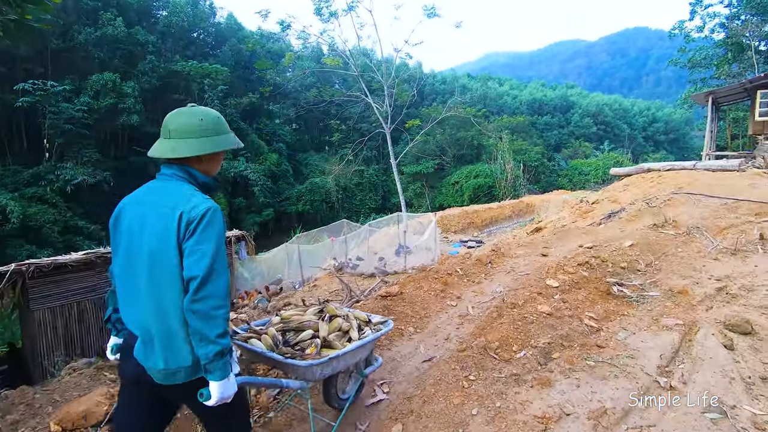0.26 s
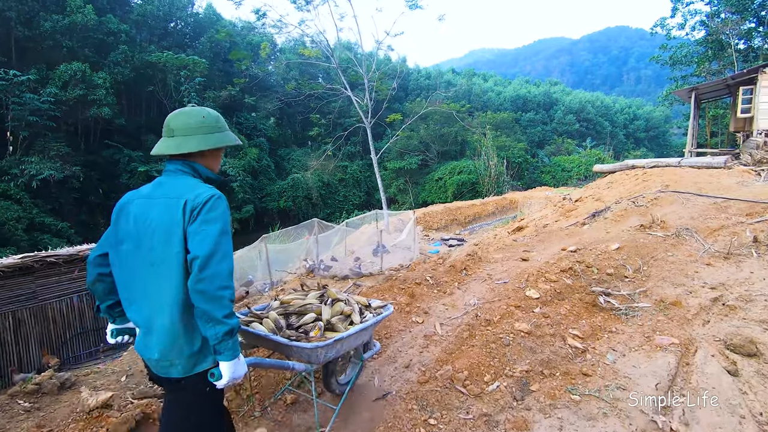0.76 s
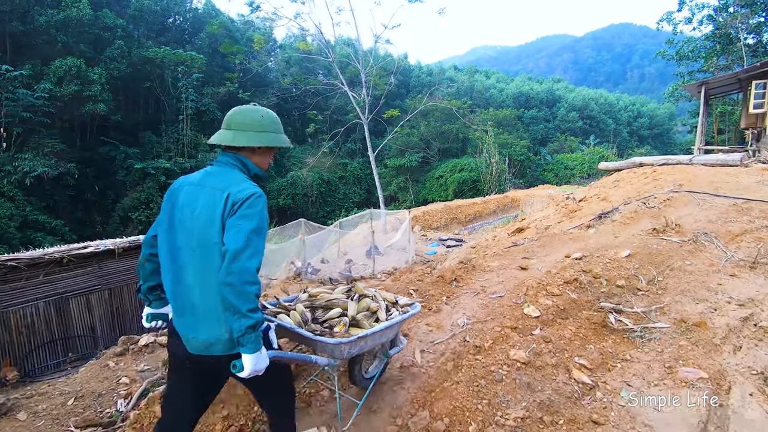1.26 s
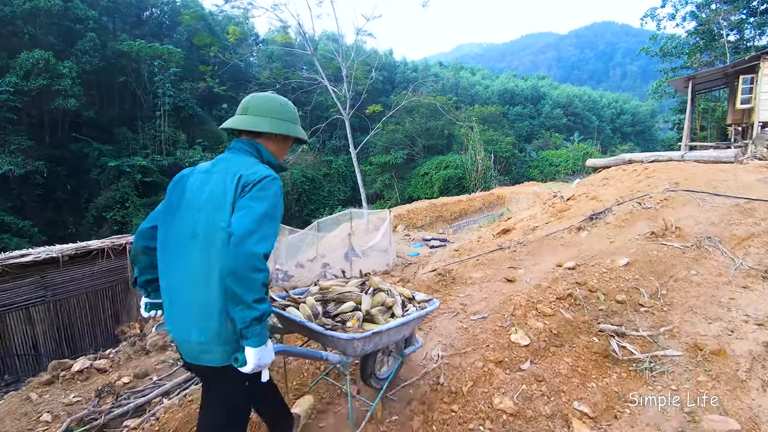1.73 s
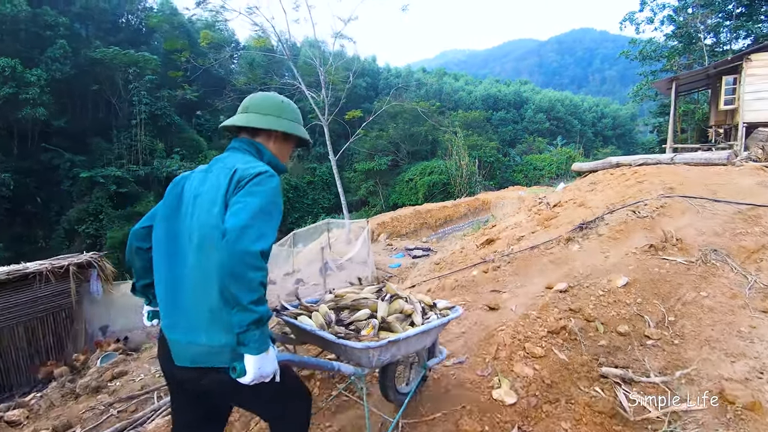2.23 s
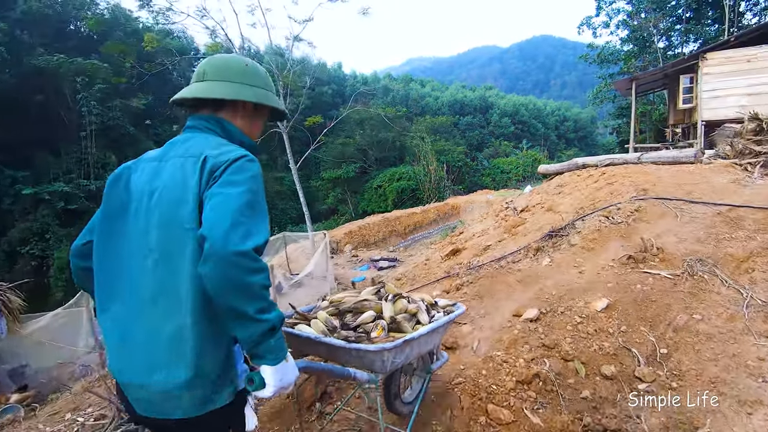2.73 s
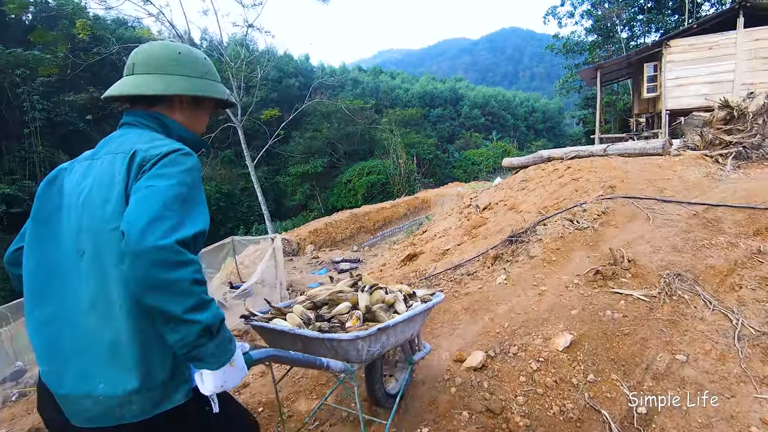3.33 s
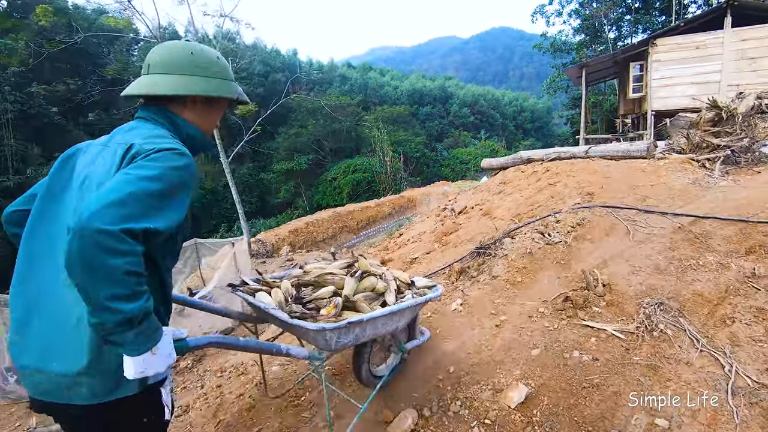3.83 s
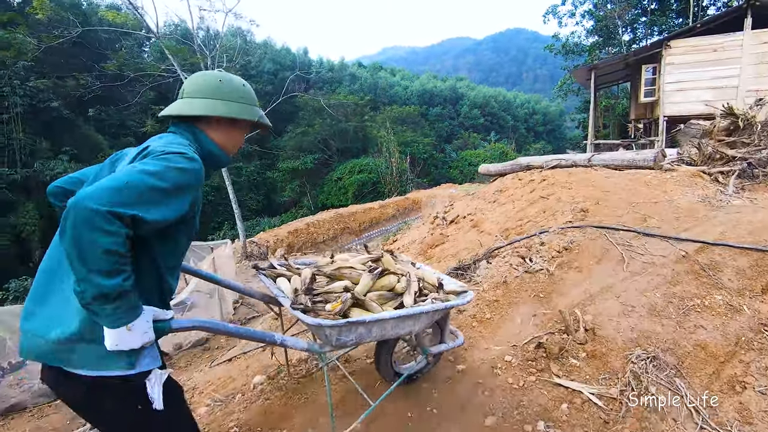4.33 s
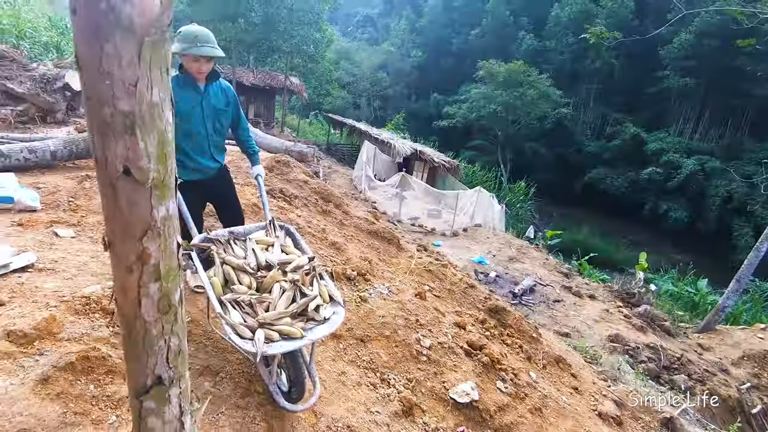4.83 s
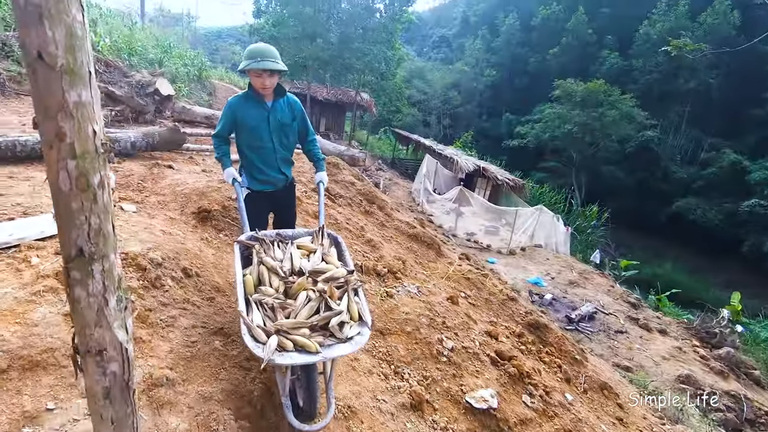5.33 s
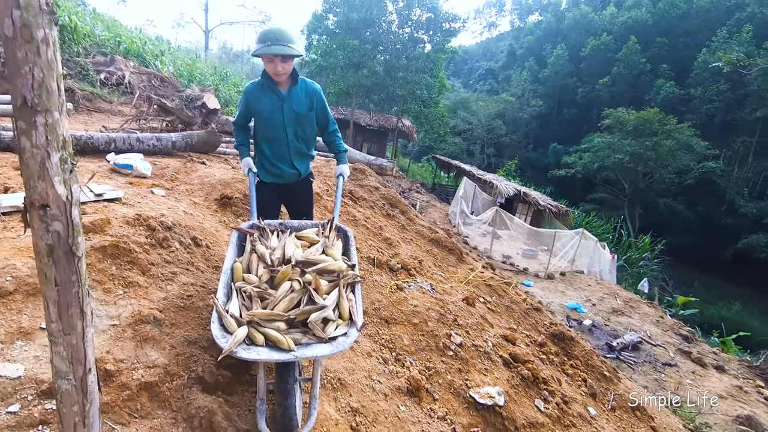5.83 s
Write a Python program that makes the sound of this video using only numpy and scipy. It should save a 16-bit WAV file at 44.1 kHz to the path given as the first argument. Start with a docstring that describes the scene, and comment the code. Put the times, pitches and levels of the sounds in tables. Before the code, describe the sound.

A steel wheelbarrow loaded with dry corn cobs is pushed over rough hillside dirt. From the start the load knocks and rattles irregularly, with crunching soil. At about 0.4 to 0.7 seconds the dry axle groans hoarsely in three short pushes, followed by a small squeak near 0.9 and thin, higher squeaks around 1.7. Twigs crack at roughly 0.7, 1.0, 2.4 and 3.2; light steel clinks are clearest near 2.35. Between 2.2 and 4.1 the clatter and dull boot and tyre thuds grow denser, strongest around 3.5 to 3.8. A brief, piercing squeal stands out at 4.6, then sparser bumps and thuds continue to 6. Behind, a throbbing cricket fades by 1.2, leaving steady faint insects; a distant bird repeats quick falling-and-rising chirps. Valley air is soft, and low wind buffets the microphone most strongly near 5.9.

```python
"""Loaded wheelbarrow on rough ground

A steel wheelbarrow full of corn cobs is pushed over rough dirt on a hillside. Its dry axle groans and
squeals as modulated harmonic tones; bursts of random impacts, filtered by resonances, make the load clatter,
the frame clink, boots and tyre thud and twigs snap. Behind it are insects (filtered noise and a throbbing
tone), a small bird repeating one phrase of gliding tones, and wind on the microphone (slow filtered noise)."""
import sys
import numpy as np
from scipy import signal
from scipy.fft import rfft, irfft
from scipy.io import wavfile
from scipy.ndimage import uniform_filter1d

SR = 44100
rng = np.random.default_rng(int(sys.argv[2]) if len(sys.argv) > 2 else 0)


def unload_wav(signal):
    """Save mono or channel-first audio to the path in sys.argv[1] as 16-bit WAV at rate SR, clipped to [-1, 1]."""
    wavfile.write(
        sys.argv[1],
        SR,
        np.round(np.clip(np.atleast_2d(signal).T, -1, 1) * 32767).astype(np.int16),
    )


N = 267863
TIME = np.arange(N) / SR  # s

# All level_db columns are relative: the functions add an overall gain to most of them.
# Spectral envelopes of the noises and impacts: pitch_hz, level_db
CHORUS_SPECTRUM = [(5700, -30.5), (6300, -9.5), (6700, 3), (7050, 6.5), (7350, 8), (7650, -2), (7950, -8.5),
                   (8150, -32.5), (8700, -38.5), (9800, -24), (10500, -41.5), (11300, -59)]
AIR_SPECTRUM = [(60, -10.5), (130, 1), (190, 4), (400, -13), (1000, -15.5), (2000, -15), (3300, -18),
                (4200, -15), (4700, -17), (5500, -30), (8700, -41), (10200, -42), (11300, -76),
                (15000, -69)]
WIND_SPECTRUM = [(10, -6), (28, 4), (45, 0.5), (80, -3.5), (140, -22), (300, -29.5), (900, -90)]
CLATTER_SPECTRUM = [(60, -37), (140, -4), (220, -3.5), (340, -5), (1000, -4.5), (2000, -2.5), (3200, -8.5),
                    (4600, -8.5), (5600, -23.5), (7500, -14), (10000, -36), (15000, -60)]
CRACK_SPECTRUM = [(100, -15.5), (600, -6.5), (1900, -2.5), (2700, -5.5), (4000, -4), (5500, -15),
                  (8000, -17), (11000, -39.5), (15500, -39)]
THUMP_SPECTRUM = [(40, -1), (120, -9), (220, 8), (330, 6.5), (560, 1), (900, 4), (1600, -11), (4000, -60)]

# Wind force at the microphone: time_s, level_db
WIND_LEVEL = [(0.0, -57), (2.3, -63.5), (2.8, -53.5), (3.7, -57.5), (4.6, -56.5), (5.45, -45.5),
              (5.88, -37.5), (6.07, -52)]
# Single gusts: centre_s, level_db
GUSTS = [(0.34, -40.5), (3.981, -47.5), (4.715, -44)]
GUST_S = 0.037  # time from the centre of a gust to 1/e of its peak

# Rolling wheel: time_s, tray_rumble_db, soil_crunch_db
ROLLING = [(0.0, -59, -62), (0.33, -81, -59), (0.4, -75, -41.5), (0.56, -68, -49), (0.75, -56, -45),
           (1.08, -73, -66.5), (1.36, -55, -60.5), (1.85, -62.5, -57), (2.15, -48, -53.5),
           (2.75, -56.5, -62), (3.15, -49.5, -53), (3.44, -51.5, -57.5), (3.63, -40, -51),
           (3.87, -64, -59.5), (4.5, -60.5, -63), (4.8, -61, -64), (5.1, -57, -59), (6.07, -47, -56.5)]
# Resonances of the tray with its load: pitch_hz, width_hz, level_db
TRAY_MODES = [(215.7, 83, 10), (412, 14, -3.5), (552, 42, 7.5), (640, 13.4, 11.5), (781, 15.3, 12),
              (889, 7.1, 15.5), (1080, 14, 7), (1130, 13, 8), (1155, 9.7, 2), (1372, 70, 8), (1695, 23, 8),
              (1840, 45, -0.5), (1893, 60, 4), (2035, 40, 9.5), (2190, 35, 7.5), (2577, 25, 12.5),
              (2830, 22, 5), (2794, 27, 7.5), (3028, 140, 10.5), (3040, 18, -16), (3370, 17, -6),
              (3850, 68, -1), (4600, 25, -11), (4790, 50, 7)]
# Jolts of the load at the larger bumps: start_s, level_db, boom_db, settle_s
JOLTS = [(0.062, -39, 1.5, 0.01), (0.084, -38, -5.5, 0.012), (0.303, -38.5, -2.5, 0.0076),
         (0.37, -30, -11, 0.0035), (0.52, -38.5, -12, 0.052), (0.658, -30, -22, 0.033),
         (0.705, -25, -18, 0.004), (0.754, -32.5, -13, 0.01), (0.823, -35.5, -32, 0.024),
         (1.217, -43.5, -0.5, 0.011), (1.255, -36.5, -29, 0.015), (1.277, -32, -4, 0.011),
         (1.312, -35.5, -14, 0.032), (1.412, -39, -4, 0.0053), (1.799, -35.5, -6.5, 0.004),
         (1.86, -41, -8, 0.0018), (2.019, -34.5, -7, 0.029), (2.072, -40, -10, 0.008),
         (2.179, -32, -20, 0.01), (2.211, -30, -4.5, 0.013), (2.292, -44, 6, 0.0081),
         (2.456, -33.5, -10.5, 0.019), (2.5, -32.5, -8, 0.021), (2.532, -30, -6, 0.01),
         (2.564, -31, -6, 0.015), (2.82, -50.5, 2, 0.057), (2.89, -45.5, -8, 0.02),
         (3.046, -39.5, -17, 0.0082), (3.104, -32, -13, 0.014), (3.237, -36, -8, 0.011),
         (3.272, -43, 5, 0.0091), (3.365, -42, -6, 0.025), (3.529, -27.5, -10.5, 0.0081),
         (3.627, -28.5, -10, 0.015), (3.706, -38.5, 2, 0.0067), (3.738, -38.5, 8.5, 0.0074),
         (3.766, -30.5, 0, 0.017), (4.103, -39.5, -11, 0.0026), (4.132, -42, -18, 0.048),
         (4.445, -47, -1, 0.016), (4.563, -45.5, -8, 0.025), (4.696, -42, -2, 0.0042),
         (4.991, -37.5, -3, 0.0067), (5.106, -33.5, -23, 0.0071), (5.165, -43.5, 0.5, 0.038),
         (5.295, -32.5, -5, 0.014), (5.482, -42, -1, 0.022), (5.558, -33, -3, 0.029),
         (5.745, -39.5, 4, 0.0055), (5.975, -43.5, -3, 0.022)]
# Lesser shifts of the load: level in dB above the soil_crunch_db column
JOSTLES_PER_S, JOSTLE_DB, JOSTLE_SPREAD_DB = 5, 3.5, 6
JOSTLE_BOOM_DB, JOSTLE_SETTLE_S = -2, 0.013

# Blows on the steel frame: start_s, level_db
CLINKS = [(0.0913, -45), (0.7062, -42), (1.317, -46), (2.073, -44.5), (2.3511, -37.5), (2.367, -38.5),
          (4.993, -50)]
# Ringing modes of the frame: pitch_hz, level_db, t60_s
FRAME_MODES = [(2600, 0.5, 0.16), (3232, 15, 0.027), (3760, 1.5, 0.09), (4550, 11.5, 0.052),
               (5670, 8, 0.058), (5560, -25, 0.078), (7100, -11, 0.14), (7150, 11.5, 0.076),
               (7900, 0, 0.22), (10070, -36, .18)]

# Runs of the bird's phrase: first_s, end_s, period_s, level_db
PHRASES = [(0.184, 0.75, 0.21, -45), (1.022, 2.9, 0.22, -42), (3.017, 4.05, 0.233, -51.5),
           (4.23, 4.75, 0.207, -45.5), (4.821, 6.05, 0.24, -49.5)]
# The three notes of a phrase, each a list of points: time_in_phrase_s, pitch_hz, level_db
NOTES = [
    [(0, 6500, -26), (0.016, 5200, -17), (0.03, 4100, -8), (0.055, 3180, -23.5)],
    [(0.066, 3100, -22.5), (0.08, 3670, -13), (0.092, 4300, -27.5)],
    [(0.098, 5700, -34), (0.109, 4400, -11.5), (0.125, 3350, -17.5)],
]

# Three pushes that make the axle groan:
# start_s, length_s, level_db, first_pitch_hz, last_pitch_hz, roughness (0-1), overtones_db
GROANS = [(0.367, 0.15, -28, 647.5, 698, 0.76, 3.5), (0.516, 0.1, -31.5, 652, 638, 0.39, -3.5),
          (0.655, 0.032, -34.5, 653, 650, 0.65, -9)]
# Groan harmonics from the second upward: level_db, before the fork colours them
GROAN_PARTIALS_DB = [-8, -15, -23, -30, -20.5, -28, -46]
# Resonances of the wheel fork: pitch_hz, width_hz, level_db
FORK_MODES = [(570, 18, 14), (815, 25, -2), (927, 23, 14), (1400, 96, 8.5), (1810, 46, 10), (1870, 74, 9.5),
              (2657, 38, 9.5), (3140, 200, 13.5), (3600, 63, 16), (3800, 31, 14), (4880, 60, 16.5)]
# Spectral envelope on which the fork resonances stand: pitch_hz, level_db
FORK_SPECTRUM = [(200, -17), (700, 5.5), (1300, -11), (1550, -11), (1900, -6), (3800, 1), (4200, -3.5),
                 (6000, -3), (9000, -4.5), (15000, -56)]
GROAN_ATTACK, GROAN_RELEASE = 0.3, 0.43  # shares of a push
GROAN_SETTLE = 0.71  # share of the roughness lost in a push as the axle finds its grip
GROAN_BEND = 3.56  # power of time: the higher, the later in a push the pitch bends
# Flutter of the grip at roughness 1, rms share of the level
GROAN_SHUDDER, OVERTONE_FLUTTER, SQUEAL_FLUTTER = 0.35, 0.7, 0.5

# Squeals of the axle on one mode: peak_s, rise_s, fall_s, level_db, pitch_hz, roughness (about 0-1)
SQUEALS = [(0.526, 0.006, 0.0062, -42, 934, 0.8), (0.625, 0.014, 0.028, -44.5, 859, 1),
           (0.836, 0.008, 0.03, -39.5, 1424, 0.6), (0.877, 0.014, 0.015, -32.5, 1391, 0.46),
           (0.9, 0.0089, 0.023, -47, 1389, 0.6), (0.987, 0.019, 0.016, -51.5, 5370, 0.18),
           (1.561, 0.05, 0.04, -59, 2890, 0.63), (1.66, 0.053, 0.043, -56.5, 2670, 0.4),
           (1.703, 0.003, 0.0065, -43, 2680, 0.3), (1.673, 0.0045, 0.005, -42.5, 2660, 0.1),
           (1.725, 0.011, 0.018, -34, 2648, 0.26), (1.749, 0.0052, 0.011, -37, 2485, 0.3),
           (1.773, 0.011, 0.02, -38.5, 2540, 0.38), (1.83, 0.04, 0.12, -68.5, 5930, 0),
           (1.88, 0.07, 0.15, -56, 2500, 0.8), (2.85, 0.049, 0.046, -58, 1287, 0.9),
           (2.91, 0.015, 0.03, -55.5, 2000, 1), (4.6, 0.0062, 0.004, -34, 5340, 0),
           (4.613, 0.00467, 0.041, -25, 5298, 0.14), (4.634, 0.013, 0.059, -57, 2640, 1.1),
           (5.628, 0.013, 0.19, -56.5, 1307, 1.12), (5.72, 0.023, 0.17, -61, 2000, 0.8),
           (5.971, 0.042, 0.039, -53, 1300, 1.07)]
# Around its peak a squeal sinks from this share above its pitch to as much below; time constant in s
SQUEAL_SAG, SQUEAL_SAG_S = 0.0077, 0.0096

# Snaps of twigs and grit: start_s, level_db
SNAPS = [(0.71, -25), (0.9892, -28), (1.2854, -32), (1.4846, -40.5), (2.0762, -32), (2.359, -28),
         (2.6528, -32.5), (3.2134, -25.5), (3.5536, -28), (3.5914, -38), (4.3685, -34), (5.1567, -39.5)]
# Thuds of boots and tyre on dirt: start_s, level_db, hollow_note_hz, grit_db
THUDS = [(1.29, -35.5, 850, -6), (1.32, -35, 673, -11), (2.218, -34, 253, -16), (2.263, -39, 240, -20),
         (2.292, -43, 221, -22), (2.536, -35, 229, -27), (3.128, -31.5, 218, -19), (3.355, -37.5, 363, -10),
         (3.507, -32, 202, -11), (3.577, -32.5, 240, -4), (3.603, -34.5, 199, -7), (3.709, -29.5, 250, -20),
         (3.925, -36, 230, -4), (4.077, -33, 245, -1), (4.556, -33.5, 417, -9), (4.711, -45, 102, 14),
         (4.958, -35, 645, -2.5), (5.541, -32, 252, -4.5), (5.746, -36, 204, -8), (5.925, -33, 267, -5)]


def amp(db):
    """Logarithmic level: decibels become an amplitude ratio."""
    return 10 ** (np.asarray(db) / 20)


def evened(x):
    """Power normalisation: scales to rms 1."""
    return x / np.sqrt(np.mean(x ** 2) + 1e-20)


def peaked(x, size=180):
    """Short-time power normalisation: the loudest few milliseconds get rms 1."""
    return x / np.sqrt(uniform_filter1d(x ** 2, size).max() + 1e-20)


def curves(rows, t):
    """Linear interpolation: the columns of a table at the times t."""
    s, *columns = np.transpose(rows)
    return [np.interp(t, s, c) for c in columns]


def add(mix, s, sound):
    """Superposition: adds a sound to the mix at time s."""
    part = mix[max(round(s * SR), 0):][:len(sound)]
    part += sound[:len(part)]


def wander(count, hz):
    """Low-passed random fluctuation: rms 1, mostly slower than hz."""
    f = np.fft.rfftfreq(count, 1 / SR)
    spectrum = rfft(rng.standard_normal(count))
    return evened(irfft(spectrum * (f > 0) / (1 + (f / hz) ** 4), count))


def response(points, modes=(), size=8192):
    """Minimum-phase system: causal impulse response of a spectral envelope with resonances on it."""
    hz = np.abs(np.fft.fftfreq(size, 1 / SR))
    f, db = np.transpose(points)
    gain = amp(np.interp(np.log(hz + 1), np.log(f + 1), db))
    resonance = sum(amp(d) ** 2 / (1 + (2 * (hz - f0) / w) ** 2) for f0, w, d in modes)
    gain = gain * np.sqrt(1 + resonance)
    # The Hilbert transform of the log gain gives the phase.
    impulse = np.fft.ifft(np.exp(np.conj(signal.hilbert(np.log(gain))))).real
    return impulse[:size // 2] * np.hanning(size)[size // 2:]


def through(x, impulse):
    """Convolution: the output of a linear system driven by x."""
    return signal.oaconvolve(x, impulse)[:len(x)]


def band(x, lo_hz, hi_hz):
    """Band-pass filtering between two cutoff frequencies."""
    edges = [lo_hz, min(hi_hz, SR / 2 - 1)]
    return signal.sosfilt(signal.butter(3, edges, "band", fs=SR, output="sos"), x)


def grains(count, per_s, spread_db):
    """Random impulse train: tiny impacts of either sign, a few larger than the rest."""
    size = amp(spread_db * np.minimum(rng.exponential(1, count), 4))
    return size * rng.choice([-1, 1], count) * (rng.random(count) < per_s / SR)


def swell(t, rise, fall):
    """Relaxation: a quick rise and an exponential fall."""
    return (1 - np.exp(-t / rise)) * np.exp(-t / max(fall, .001))


def echoes(x, t60, wet_db):
    """Scattering: adds a decaying tail of sparse reflections."""
    t = np.arange(SR // 2) / SR
    taps = grains(len(t), 2000, 1) * amp(-60 * t / t60) * (t > .004)
    return x + amp(wet_db) * through(x, taps / np.linalg.norm(taps))


def insects(chorus_db=-64, cricket_db=-51.0, cricket_hz=7440, chirps_per_s=27.0, stop_s=1.21, fade_s=0.93):
    """Amplitude modulation: one nearer cricket throbs and fades out before a steady far chorus of noise."""
    chorus = evened(through(rng.standard_normal(N), response(CHORUS_SPECTRUM)))
    throb = np.sin(np.pi * chirps_per_s * TIME - .7) ** 2
    fade = np.clip((stop_s - TIME) / fade_s, 0, 1)
    hz = cricket_hz + 75 * wander(N, 210)
    cricket = throb * fade * np.sin(2 * np.pi * np.cumsum(hz) / SR)
    return amp(chorus_db) * chorus + amp(cricket_db) * cricket


def breeze(air_db=-55, wind_db=-2, lumps_db=3.5):
    """Turbulence as filtered noise: the hush of the wooded valley and lumpy gusts at the microphone."""
    air = evened(through(rng.standard_normal(N), response(AIR_SPECTRUM))) * amp(.5 * wander(N, 5.6))
    wind = evened(through(rng.standard_normal(N), response(WIND_SPECTRUM)))
    force = amp(curves(WIND_LEVEL, TIME)[0] + lumps_db * wander(N, 4.5))
    force += sum(amp(db) * np.exp(-((TIME - s) / GUST_S) ** 2) for s, db in GUSTS)
    return amp(air_db) * air + amp(wind_db) * force * wind


def rolling(rumble_db=-1, crunch_db=-2):
    """Random excitation of resonances: crushed crumbs of soil crunch and the loaded tray shakes."""
    rumble, crunch = curves(ROLLING, TIME)
    tray = response(CLATTER_SPECTRUM, TRAY_MODES)
    shake = evened(band(through(grains(N, 950, 1.0), tray), 101, 407))
    crushing = grains(N, 1600, 2.9) * amp(3.8 * wander(N, 33))
    crumbs = evened(band(through(crushing, tray), 470, 9800))
    return amp(rumble + rumble_db) * shake + amp(crunch + crunch_db) * crumbs


def jostles():
    """Random events in time slots: small bumps follow the soil crunch in level; rows like those of JOLTS."""
    rows = []
    for slot in np.arange(0, N / SR, 1 / JOSTLES_PER_S):
        s = slot + rng.random() / JOSTLES_PER_S
        _, crunch = curves(ROLLING, s)
        db = crunch + JOSTLE_DB + JOSTLE_SPREAD_DB * rng.standard_normal()
        rows.append((s, db, JOSTLE_BOOM_DB, JOSTLE_SETTLE_S))
    return rows


def cob_modes(count=9):
    """Local modes: each landing rings cobs and a patch of sheet; rows of pitch_hz, width_hz, level_db."""
    hz = np.exp(rng.uniform(np.log(800), np.log(4800), count))
    return [(f, 14 + f / 130, 11) for f in hz]


def jolts(clatter_db=-6, boom_db=-4, bright_db=-28, rattle_db=-22, rattle_s=0.033, clump_db=3.0):
    """Impact excitation: cobs land in a quick, uneven cluster, and the tray's boom builds more slowly."""
    out, t = np.zeros(N), np.arange(SR // 4) / SR
    for s, db, boom, settle in JOLTS + jostles():
        tray = response(CLATTER_SPECTRUM, TRAY_MODES + cob_modes())
        shape = swell(t, 0.0021, settle) + amp(rattle_db) * swell(t, 0.0072, rattle_s)
        shape = shape * amp(clump_db * wander(len(t), 87))
        cobs = through(grains(len(t), 4000, 3.06) * shape, tray)
        body = through(grains(len(t), 2200, 4.1) * swell(t, 0.0038, 1.54 * settle), tray)
        sound = amp(clatter_db) * peaked(band(cobs, 530, 6000))
        sound += amp(bright_db) * peaked(band(cobs, 5400, 13000))
        sound += amp(boom + boom_db) * peaked(band(body, 147, 625))
        add(out, s, amp(db) * sound)
    return out


def clinks(ring_db=-6, clash_db=-4, clash_s=0.012):
    """Modal ringing: steel chatters against steel and excites the decaying modes of the frame."""
    out, t, crack = np.zeros(N), np.arange(SR // 4) / SR, response(CRACK_SPECTRUM)
    ring = sum(amp(db - 60 * t / t60) * np.sin(2 * np.pi * hz * t) for hz, db, t60 in FRAME_MODES)
    for s, db in CLINKS:
        contact = grains(len(t), 5000, 4.0) * swell(t, 0.0045, clash_s)
        ringing = amp(db + ring_db) * peaked(through(contact, ring))
        clash = amp(db + clash_db) * peaked(through(contact, crack))
        add(out, s, ringing + clash)
    return out


def bird():
    """Frequency glides: a distant bird repeats a long falling note, a short rise and a quick fall."""
    out = np.zeros(N)
    for first, end, period, db in PHRASES:
        for s in np.arange(first, end, period):
            pitch = 1 + 0.01185 * rng.standard_normal()  # each phrase is slightly sharp or flat
            for note in NOTES:
                t = np.arange(note[0][0], note[-1][0], 1 / SR)
                hz, note_db = curves(note, t)
                waver = 1 + .35 * wander(len(t), 120)
                tone = np.sin(2 * np.pi * np.cumsum(hz * pitch) / SR)
                fades = signal.windows.tukey(len(t), .2)
                add(out, s + t[0], amp(db + note_db) * waver * tone * fades)
    return echoes(out, t60=.2, wet_db=-8)


def groan(jitter=0.042, rasp_db=-13, dulling_db=-4):
    """Stick-slip friction: uneven slips at the axle smear the overtones and rasp through the fork."""
    out = np.zeros(N)
    for s, length, db, first_hz, last_hz, roughness, over_db in GROANS:
        t = np.arange(0, length, 1 / SR)
        u = t / length  # share of the push completed
        hz = first_hz + (last_hz - first_hz) * u ** GROAN_BEND
        rough = roughness * (1 - GROAN_SETTLE * u)
        push = np.minimum(np.minimum(u / GROAN_ATTACK, (1 - u) / GROAN_RELEASE), 1) ** 0.66
        phase = 2 * np.pi * np.cumsum(hz * (1 + jitter * rough * wander(len(t), 180))) / SR
        overtones = np.zeros(len(t))
        for k, partial_db in enumerate(GROAN_PARTIALS_DB, 2):
            partial = np.sin(k * phase + rng.uniform(0, 2 * np.pi))
            flutter = 1 + OVERTONE_FLUTTER * rough * wander(len(t), 123)
            overtones += amp(partial_db) * partial * flutter
        # The noise of the rasp pulses once in every cycle.
        pulsed_noise = rng.standard_normal(len(t)) * (1 + np.cos(phase)) ** 2
        rasp = evened(band(pulsed_noise, 540, 5700))
        upper = np.sqrt(2) * overtones + amp(rasp_db) * rough * rasp
        upper = through(amp(over_db + dulling_db * u) * upper, response(FORK_SPECTRUM, FORK_MODES))
        tone = np.sqrt(2) * np.sin(phase) * (1 + GROAN_SHUDDER * rough * wander(len(t), 70))
        add(out, s, amp(db) * push * (tone + upper))
    return out


def squeals(second_db=-37, rough_overtones_db=22, fall_db=-14, jitter=0.033):
    """Mode locking: the axle holds one sagging near sine with weak overtones and an unsteady grip."""
    out = np.zeros(N)
    for s, rise, fall, db, hz, rough in SQUEALS:
        t = np.arange(-2.5 * rise, 2.5 * fall, 1 / SR)  # zero at the peak
        envelope = np.exp(-(t / np.where(t < 0, rise, fall)) ** 2)
        sag = SQUEAL_SAG * np.tanh(t / SQUEAL_SAG_S)
        pitch = hz * (1 - sag + jitter * rough * wander(len(t), 190))
        phase = 2 * np.pi * np.cumsum(pitch) / SR
        harmonics = [k for k in range(2, 5) if k * hz < SR / 2]
        overtones = sum(amp((k - 2) * fall_db * rough) * np.sin(k * phase) for k in harmonics)
        tone = np.sin(phase) + amp(second_db + rough_overtones_db * rough) * overtones
        grip = 1 + (0.061 + SQUEAL_FLUTTER * rough) * wander(len(t), 85)
        add(out, s + t[0], np.sqrt(2) * amp(db) * envelope * grip * tone)
    return out


def axle():
    """Reverberant decay: groan and squeals ring on briefly in the frame."""
    return echoes(groan() + squeals(), t60=.06, wet_db=-14)


def snaps(crack_db=-7, crack_s=0.003, tail_db=-27):
    """Brittle fracture: dense bursts of impulses make short dry cracks under wheel and boot."""
    out, t, crack = np.zeros(N), np.arange(SR // 16) / SR, response(CRACK_SPECTRUM)
    for s, db in SNAPS:
        shape = swell(t, 0.000097, crack_s) + amp(tail_db) * swell(t, 0.0011, 0.059)
        burst = grains(len(t), 11000, 1.0) * shape
        add(out, s, amp(db + crack_db) * peaked(through(burst, crack)))
    return out


def thuds(push_db=-7, grit_db=-7, thud_s=0.016, hollow_db=13):
    """Damped impact: a dull push into packed earth has a hollow resonance and crushes a little grit."""
    out, t, crack = np.zeros(N), np.arange(SR // 5) / SR, response(CRACK_SPECTRUM)
    for s, db, hz, grit in THUDS:
        # The first four tray modes sound along with the hollow note.
        earth = response(THUMP_SPECTRUM, TRAY_MODES[:4] + [(hz, hz / 4, hollow_db)])
        push = peaked(through(grains(len(t), 3200, 1.2) * swell(t, 0.00093, thud_s), earth))
        crunch = peaked(through(grains(len(t), 1700, 1.1) * swell(t, 0.0018, 0.0039), crack))
        add(out, s, amp(db + push_db) * (push + amp(grit + grit_db) * crunch))
    return out


def scene():
    """Superposition of sources: the barrow in the open, with faint scatter from the slope."""
    barrow = rolling() + jolts() + clinks() + axle() + snaps() + thuds()
    outdoors = echoes(barrow, t60=.2, wet_db=-24)
    return (insects() + breeze() + outdoors + bird())[None]


def record(dry, edge_hz=15750):
    """Band limitation: a linear-phase low-pass filter removes the highest treble."""
    lowpass = signal.firwin(511, edge_hz, window=("kaiser", 9), fs=SR)
    return signal.oaconvolve(dry, lowpass[None], "same")


dry = scene()
out = record(dry)
unload_wav(out)
```